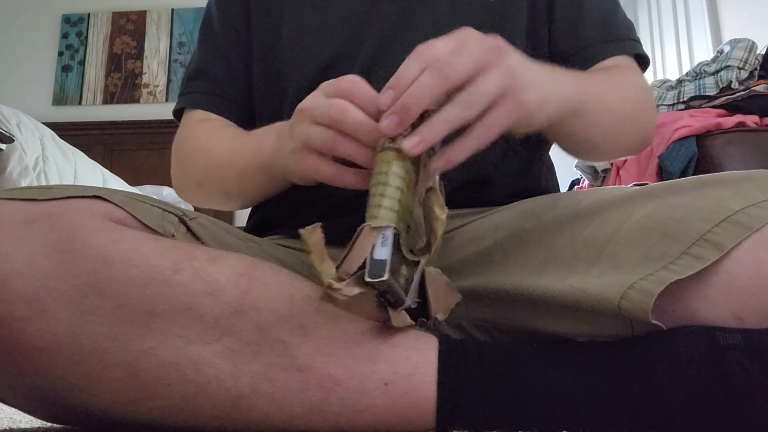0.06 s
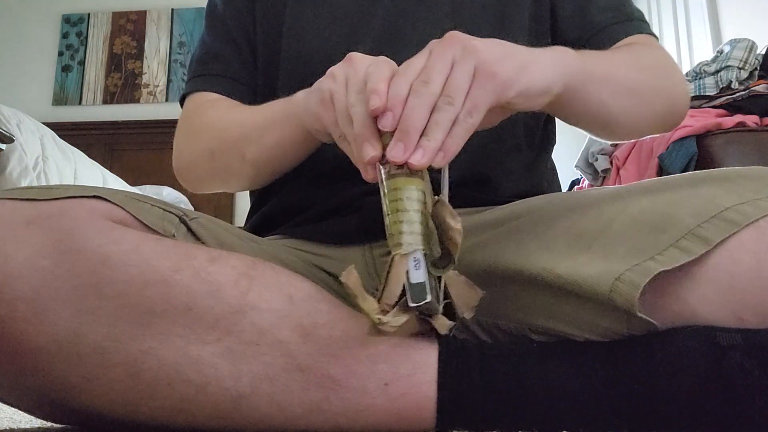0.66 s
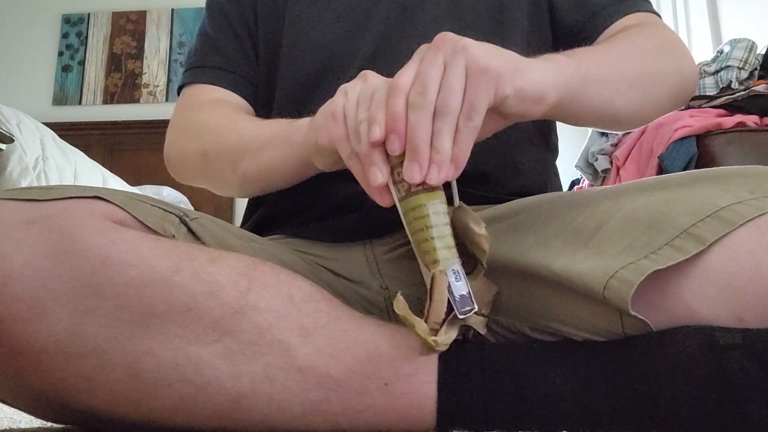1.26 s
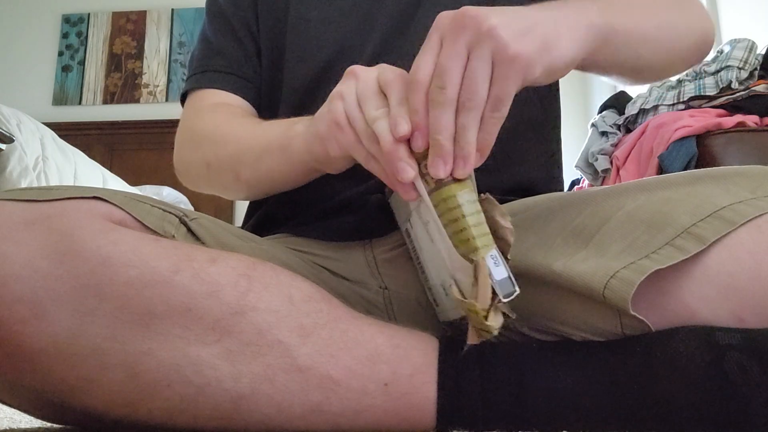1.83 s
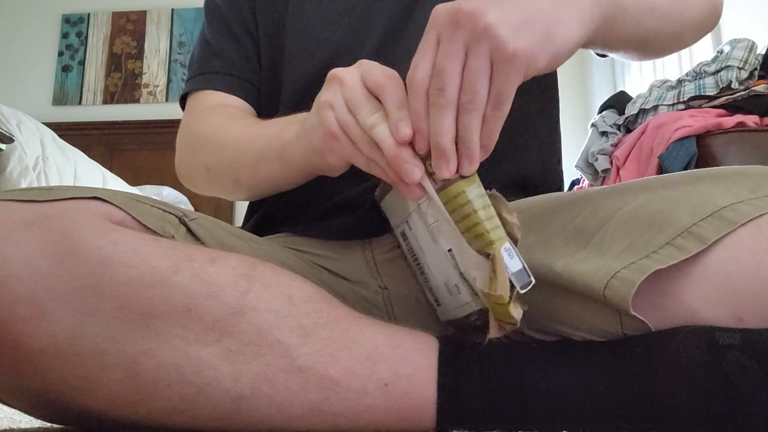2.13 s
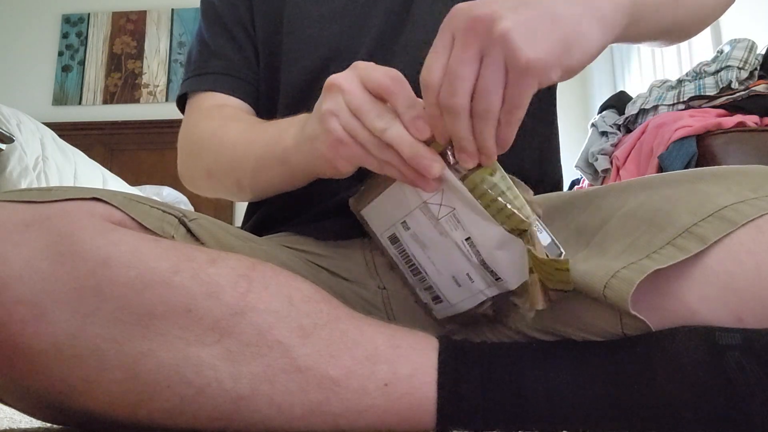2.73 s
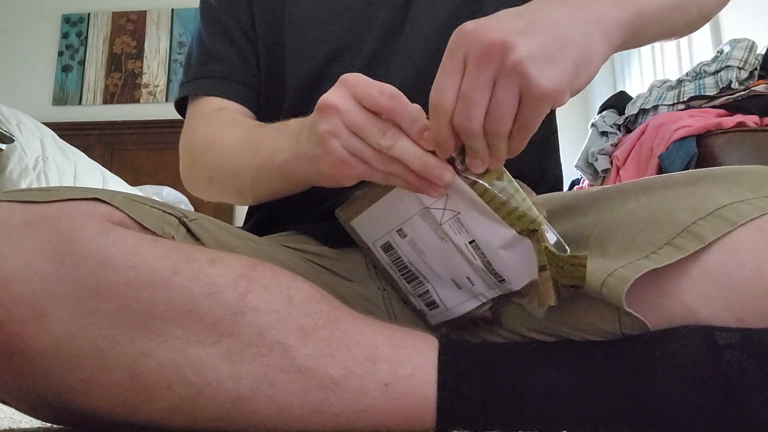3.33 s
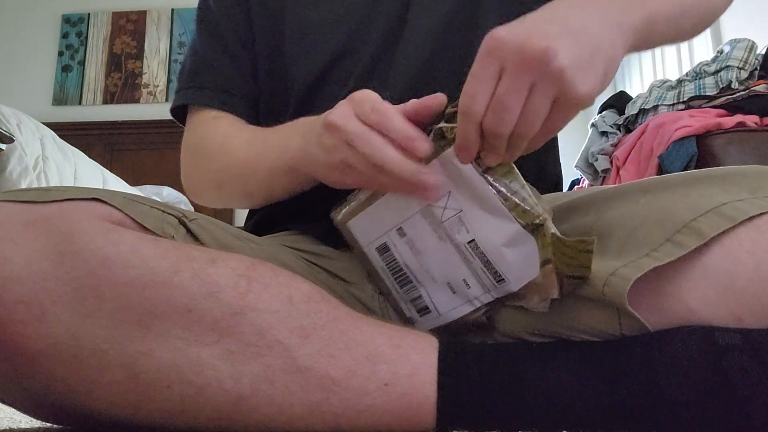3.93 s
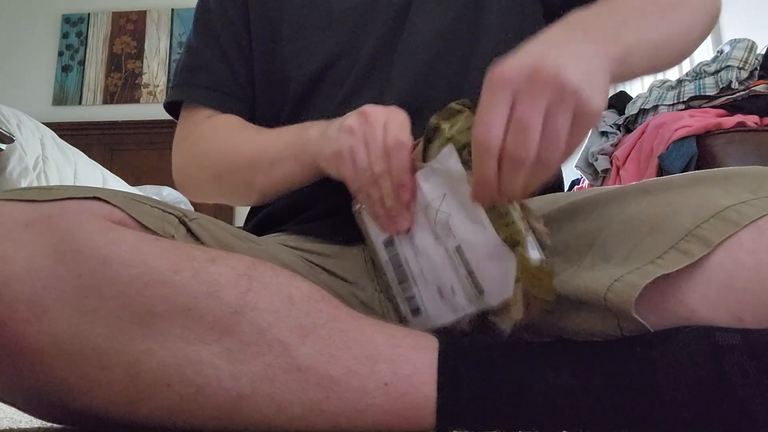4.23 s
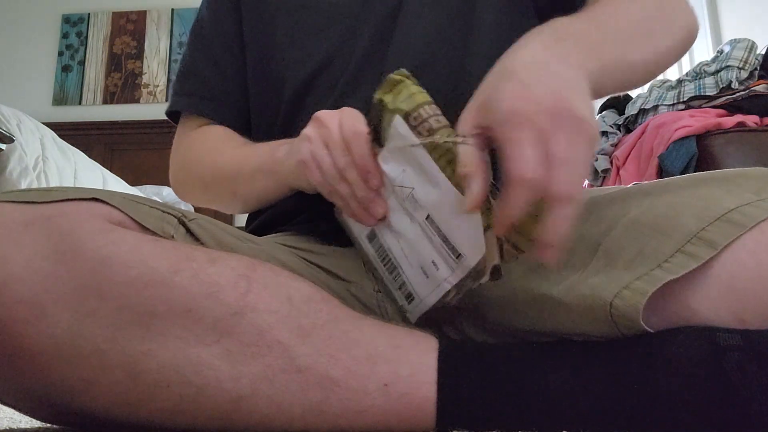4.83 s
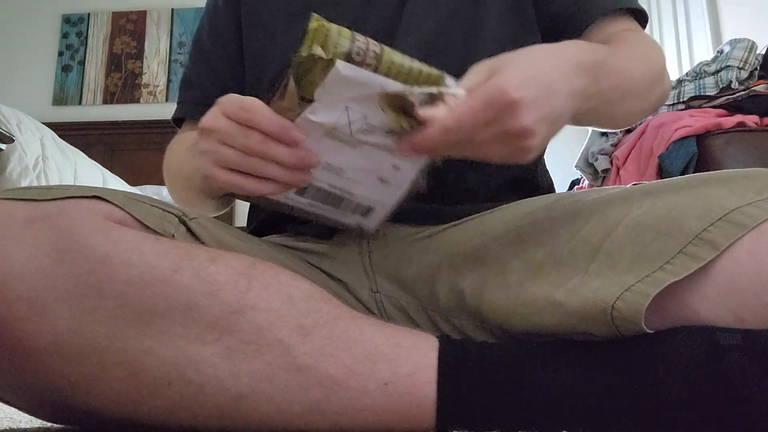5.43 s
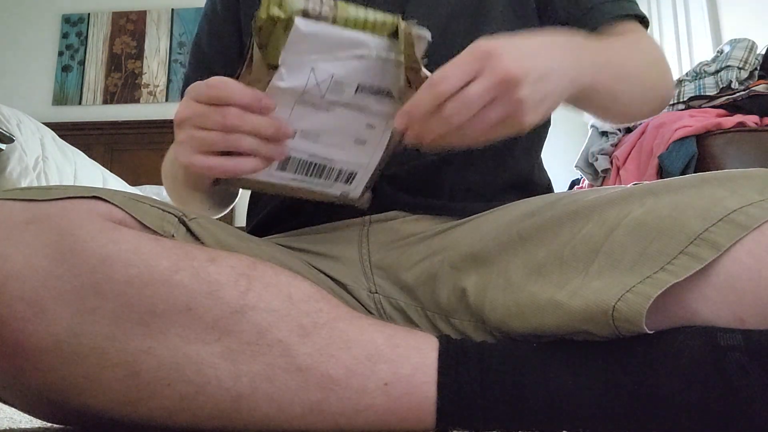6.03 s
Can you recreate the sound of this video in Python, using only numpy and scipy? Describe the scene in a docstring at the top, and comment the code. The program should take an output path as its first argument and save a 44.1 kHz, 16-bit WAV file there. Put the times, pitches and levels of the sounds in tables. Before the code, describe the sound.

A padded paper envelope is worked by hand near a stereo microphone in a quiet bedroom. It starts with soft sliding and rustling, dotted with crisp crackles and gentle thuds, and one brief scratchy slip. After a quieter spell comes a louder cluster of paper snaps and bumps, followed by more hissy rubbing and crinkling. A faint house hum lies underneath.

```python
"""Fingers and cloth rub over a torn padded paper mailer, on a lap in a bedroom, close to a stereo microphone.
Small creases crinkle under the strokes, the stiff paper buckles in sharp snaps, and the padded body
takes dull bumps. One edge briefly sticks and slips in a run of tiny ticks.
The furnished room answers shortly, over the faint hum of the house."""
import sys
import numpy as np
from scipy import signal
from scipy.fft import rfft, irfft, next_fast_len
from scipy.io import wavfile
from scipy.ndimage import uniform_filter1d

SR = 44100
rng = np.random.default_rng(int(sys.argv[2]) if len(sys.argv) > 2 else 0)


def bounce(signal):
    """Save signal as a 16-bit WAV file at the path given by the first command-line argument."""
    frames = np.transpose(np.atleast_2d(signal))
    limited = np.clip(frames, -1, 1)
    pcm = np.round(limited * 32767).astype(np.int16)
    wavfile.write(sys.argv[1], SR, pcm)


N = 272097
TIME = np.arange(N) / SR
SIZE = 4096  # samples in a filter or a single impact
BIN_HZ = np.fft.rfftfreq(SIZE, 1 / SR)
LEAD_IN_S = 0.02  # a panel strains this long before it pops


def amp(db):
    """Decibels to gain."""
    return 10 ** (np.asarray(db) / 20)


def unit_rms(x):
    """Scales to rms 1."""
    return x / np.sqrt(np.mean(x ** 2) + 1e-20)


def curve(points, hz=BIN_HZ):
    """Interpolates rows of frequency and value on a log-frequency axis."""
    point_hz, value = np.transpose(points)
    return np.interp(np.log(hz + 1), np.log(point_hz + 1), value)


def add(mix, start_s, sound):
    """Mixes a stereo sound in at start_s."""
    part = mix[:, max(round(start_s * SR), 0):][:, :sound.shape[1]]
    part += sound[:, :part.shape[1]]


def colour(x, db):
    """Minimum-phase filter with gain db at BIN_HZ: each resonance rings after its cause."""
    cepstrum = irfft(np.log(amp(np.maximum(db, db.max() - 80))))
    cepstrum[1:SIZE // 2] *= 2
    cepstrum[SIZE // 2 + 1:] = 0
    impulse = irfft(np.exp(rfft(cepstrum)))
    return signal.oaconvolve(x, impulse[None], axes=1)[:, :x.shape[1]]


def hit(x, db):
    """Gives a sound the energy of 10 ms at the level db."""
    return amp(db) * unit_rms(x) * np.sqrt(0.01 * SR / x.shape[1])


def wander(per_s):
    """A slow random curve of rms 1."""
    knots = np.arange(0, TIME[-1] + 1, 1 / per_s)
    return unit_rms(np.interp(TIME, knots, rng.standard_normal(len(knots))))


def microphone(x):
    """Both ports hear row 0 of x; row 1 sets them apart. The left is nearer and brighter."""
    # Each row: frequency in Hz, likeness of the two ports from 0 to 1.
    port_likeness = [(60, 0.94), (300, 1), (1000, 0.89), (2000, 1), (5000, 0.71), (14000, 0.88)]
    # Each row: frequency in Hz, left over right in dB.
    port_balance = [(60, 0.42), (250, 1.2), (1200, 5.4), (4400, 1.9), (8000, 4.9), (13000, 7)]
    # Each row: frequency in Hz, phase lead of the left port in radians.
    port_lead = [(60, 0.2), (250, 0.092), (1000, 0.69), (2500, 1.22), (5000, 1.26), (9000, 1.8),
                 (15000, 1.44)]
    size = next_fast_len(x.shape[1] + SIZE)
    hz = np.fft.rfftfreq(size, 1 / SR)
    likeness, ratio = curve(port_likeness, hz), amp(curve(port_balance, hz))
    common, apart = rfft(x, size) * np.sqrt([(1 + likeness) / 2, (1 - likeness) / 2])
    left = (common + apart) * ratio
    right = (common - apart) * np.exp(-1j * curve(port_lead, hz))
    return irfft(np.array([left, right]) * np.sqrt(2 / (1 + ratio ** 2)), size)[:, :x.shape[1]]


def mailer_db():
    """The lift that the mailer's resonances give to all that excites it."""
    # Each row: resonance in Hz, width in Hz, lift in dB.
    modes = [(290, 69, 3.5), (478, 190, 4), (674, 28.4, 4), (1063, 110, 5), (1430, 290, 2.5), (1864, 68, 2),
             (2120, 650, 7.5), (4060, 350, 2.5), (4750, 260, 4.5), (5650, 330, 6), (7510, 670, 6),
             (11460, 760, 2.5)]
    return sum(db / (1 + (2 * (BIN_HZ - hz) / width) ** 2) for hz, width, db in modes)


def finger_strokes(attack_s=0.041, release_s=0.028):
    """Levels in dB of cloth, rustle, hiss and grain: each stroke swells and lets go over the grip."""
    # Fingers slide over the mailer. Each row: start in seconds, seconds until release, panel rustle
    # in dB, cloth and surface hiss each in dB over the rustle, fine grain in dB over the hiss.
    strokes = [(-0.043, 0.058, -48.5, -10, -8.5, 2), (0.168, 0.04, -53.5, -0.5, 0, -8),
               (0.263, 0.071, -59.5, 5, -3.5, -10), (0.358, 0.071, -56.5, 1, -6.5, 0.5),
               (0.446, 0.16, -60.5, 2.5, -9.5, 1), (0.589, 0.091, -57, 2, -4, -8),
               (0.846, 0.082, -58, -2, -1.5, -2), (0.986, 0.13, -65.5, -6, 0.5, -1),
               (1.26, 0.084, -57.5, -4, -4.5, 4.5), (1.373, 0.13, -57, -8, -7, 4.5),
               (1.519, 0.059, -59.5, 3, -9, 13), (1.671, 0.15, -58.5, -4, -14, -2),
               (1.828, 0.09, -61, 0.5, -18, -13), (2.015, 0.069, -51, -4.5, -12, -12),
               (2.134, 0.11, -56, -6, -8, -7), (2.53, 0.071, -66, 2, -4, -13),
               (2.64, 0.057, -48.5, 0, -10, -3), (2.713, 0.14, -63, 3.5, -6.5, -7),
               (3.073, 0.116, -66, -19, -7.5, 6), (3.329, 0.057, -59, -6, -1.5, 0.5),
               (3.652, 0.071, -52.5, -1, -2.5, 1), (3.858, 0.078, -55.5, -1, -1.5, -13),
               (3.925, 0.08, -52.5, 2, 0, -11), (4.056, 0.12, -51.5, -1, -8, 2),
               (4.199, 0.035, -40, -0.5, 0.5, -6), (4.431, 0.068, -50.5, -6.5, 1.5, -0.5),
               (4.528, 0.15, -65, -26, -10.5, 2.5), (4.68, 0.052, -46.5, -7.5, -17.5, 3),
               (4.739, 0.059, -57.5, -1, 5.5, 4.5), (4.825, 0.037, -40.5, -10.5, -0.5, 0.5),
               (5.027, 0.21, -51.5, -8.5, 0.5, 1), (5.106, 0.054, -47.5, -9, -5, -17),
               (5.17, 0.096, -44, -15, -9, -5), (5.26, 0.16, -50, -9, -2, -3.5),
               (5.413, 0.11, -49, -27, 0, -5), (5.528, 0.11, -55.5, -11, 4, -18),
               (5.674, 0.087, -54.5, -2.5, 5.5, -2), (5.771, 0.44, -60.5, -9.5, 2.5, -13),
               (5.838, 0.04, -53.5, -7, 7.5, -7), (6.022, 0.044, -60.5, 2, 6.5, -2)]
    # The grip never rests between strokes: cloth, rustle, hiss and fine grain in dB.
    grip_db = [-67.5, -70, -71, -76.5]
    power = amp(grip_db)[:, None] ** 2 * np.ones(N)
    for start, length, rustle, cloth, hiss, grain in strokes:
        during = (TIME > start) & (TIME < start + length + 6 * release_s)
        t = TIME[during] - start
        envelope = np.minimum(t / attack_s, 1) * np.exp(-np.maximum(t - length, 0) / release_s)
        gains = amp(rustle + np.array([[cloth], [0], [hiss], [hiss + grain]]))
        power[:, during] += (gains * envelope) ** 2
    return 10 * np.log10(power)


def friction(per_s, spread_db, smooth, clump_db):
    """Tiny catches of very unequal size, in clumps, over smooth sliding noise."""
    size = amp(spread_db * np.minimum(rng.exponential(1, N), 4.5))
    size *= rng.random(N) < per_s / SR
    catches = unit_rms(size * rng.choice([-1., 1.], (2, N)))
    clumps = amp(clump_db * wander(per_s=90))
    return unit_rms((catches + smooth * rng.standard_normal((2, N))) * clumps)


def rubbing(levels):
    """Cloth, panels and paper surface sound under the same strokes, each with its own friction."""
    # Dull cloth, rustling panels, surface hiss, fine grain. Each row: frequency in Hz, gain in dB.
    cloth_tone = [(30, -16), (70, -4.5), (130, 2.5), (320, 0), (550, -3), (800, -2.5), (1500, -12.5),
                  (4000, -75)]
    rustle_tone = [(300, -22.5), (600, -5.5), (900, 1.5), (1200, 1.5), (2100, -4), (2800, -13.5),
                   (4000, -11), (9000, -54)]
    hiss_tone = [(1500, -23.5), (2700, 0.5), (3300, 0), (4500, 5.5), (6500, -0.5), (8000, -15.5),
                 (11000, -7), (16000, -30)]
    grain_tone = [(4000, -26), (6500, -3.5), (8000, 0), (10000, -4.5), (13000, -4), (16000, -3.5)]
    cloth, rustle, hiss, grain = levels
    layers = [(cloth_tone, cloth + 1, friction(per_s=250, spread_db=2.76, smooth=1, clump_db=2.16)),
              (rustle_tone, rustle - 1.5, friction(per_s=450, spread_db=3.13, smooth=1, clump_db=1.44)),
              (hiss_tone, hiss - 1.5, friction(per_s=1500, spread_db=2, smooth=0.89, clump_db=2.14)),
              (grain_tone, grain + 2, friction(per_s=900, spread_db=4.3, smooth=0.98, clump_db=3.6))]
    return sum(amp(db) * unit_rms(colour(drive, curve(tone) + mailer_db())) for tone, db, drive in layers)


def bending(x, depth_db=2.8, patch_hz=380, patch_s=0.13):
    """As the fingers move and bend the sheet, its resonances come and go."""
    hz, when, spectra = signal.stft(x, SR, nperseg=512, noverlap=384)
    patches = rng.standard_normal(spectra.shape[1:])
    patches = uniform_filter1d(patches, int(patch_hz / hz[1]) + 1, axis=0)
    patches = uniform_filter1d(patches, int(patch_s / when[1]) + 1, axis=1)
    gain = unit_rms(amp(depth_db * unit_rms(patches)))
    return signal.istft(spectra * gain, SR, nperseg=512, noverlap=384)[1][:, :N]


def house_hum(level_db=-60):
    """Room tone: the low steady hum and hiss of the house."""
    # Each row: frequency in Hz, gain in dB.
    hum_tone = [(15, -17), (28, 3), (42, 5), (62, 8.5), (90, 0.5), (150, -7), (400, -13), (1200, -18),
                (3000, -39), (5000, -53), (10000, -48), (16000, -45)]
    return amp(level_db) * unit_rms(colour(rng.standard_normal((2, N)), curve(hum_tone)))


def burst(rise_ms, decay_ms, shiver_db, shiver_ms):
    """A short avalanche of breaking fibres, and the weaker shiver of the sheet after it."""
    ms = np.arange(SIZE) * 1000 / SR
    rise = 1 - np.exp(-(ms / rise_ms) ** 2)
    fall = np.exp(-ms / decay_ms) + amp(shiver_db) * np.exp(-ms / shiver_ms)
    spectrum = rfft(rng.standard_normal((2, SIZE)) * rise * fall)
    power = uniform_filter1d(abs(spectrum) ** 2, size=120, axis=1)
    return irfft(spectrum / np.sqrt(abs(power) + 1e-12)) * (ms < 60)  # white on the whole


def facets(ripple_db, width_hz):
    """Every patch of the crumpled sheet has its own chance resonances: a ripple in dB."""
    ripple = uniform_filter1d(rng.standard_normal(len(BIN_HZ)), int(width_hz * SIZE / SR) + 1)
    return ripple_db * unit_rms(ripple)


def buckle(flex_db, pitch_hz, crack_db, brightness, strain_s=0.0054):
    """A panel creaks under load, then pops through with a papery knock while its crease cracks."""
    # The crack of a crease. Each row: frequency in Hz, gain in dB.
    crack_tone = [(1200, -17), (2200, -16), (3200, -10.5), (4500, 2), (9000, 2.5), (13000, 0.5), (16000, 0)]
    hz, t = BIN_HZ + 1, np.arange(SIZE) / SR
    octaves = np.log2(hz / pitch_hz)
    panel_db = 4 / (1 + (octaves / 0.51) ** 2)
    panel_db -= 8 * np.maximum(octaves, 0) ** 2 + 0.9 * np.maximum(-octaves, 0)  # steeper above the peak
    panel_db -= 10 * np.log10((1 + (hz / 2500) ** 8) * (1 + (170 / hz) ** 4))  # band-pass
    crease_db = curve(crack_tone, hz) + brightness * np.log2(np.maximum(hz, 3000) / 7500)
    sheet_db = mailer_db() + facets(ripple_db=2, width_hz=240)

    def radiate(drive, tone_db, level_db):
        """One impact passes through the sheet to the microphone."""
        return hit(microphone(colour(drive, sheet_db + tone_db)), level_db)

    settle = (1000 / pitch_hz) ** 0.54  # a large, low panel settles more slowly than a small one
    knock = radiate(burst(0.87, 1.4 * settle, shiver_db=-22, shiver_ms=5.7), panel_db, flex_db)
    crack = radiate(burst(0.8, 0.68 * settle, shiver_db=-23, shiver_ms=5), crease_db, crack_db)
    swell = np.exp(-abs(t - LEAD_IN_S) / strain_s) * (t < LEAD_IN_S)
    strain = radiate(swell * rng.standard_normal((2, SIZE)), panel_db, flex_db - 16.5)
    pop = np.roll(knock + crack, round(LEAD_IN_S * SR), axis=1)
    pan_db = -0.6 + 0.12 * max(brightness, 0)  # bright cracks face the left port
    left, right = (strain + pop) * amp([[pan_db / 2], [-pan_db / 2]])
    # Each fold faces its own way, so the two ports hear it in a different colour.
    return np.array([left, colour(right[None], facets(ripple_db=1, width_hz=700))[0]])


def crinkles(levels, per_s=45, spread_db=4, kinds=12):
    """Small creases give way at random moments, as strongly as the stroke presses them."""
    _, rustle, hiss, _ = levels
    size = amp((rustle + hiss) / 2 + spread_db * np.minimum(rng.exponential(1, N), 3))
    size *= rng.random(N) < per_s / SR
    kind = rng.integers(0, kinds, N)
    creases = [buckle(-7 + 3 * softness, 950 * 2 ** (0.4 * pitch), -10.5 - 3 * softness, 5 * tilt)
               for softness, pitch, tilt in rng.standard_normal((kinds, 3))]
    out = np.zeros((2, N))
    for i in np.flatnonzero(size):
        add(out, TIME[i], size[i] * creases[kind[i]])
    return out


def snaps():
    """The stiff paper gives way in large buckles, one by one."""
    # Each row: time of the pop in seconds, panel flex in dB, panel pitch in Hz, crease crack in dB,
    # brightness of the crack in dB per octave.
    buckles = [(0.0855, -56.5, 1340, -51, 2), (0.096, -58, 1100, -42.5, -5.5), (0.583, -46.5, 640, -73, -5),
               (0.7207, -45.5, 1530, -47.5, -27), (0.905, -41.5, 1270, -31, 9), (0.9779, -47, 840, -76, -1),
               (1.0323, -57, 910, -46, 4), (1.2907, -62, 1210, -43.5, 10.5), (1.3246, -47, 920, -26, 12),
               (1.476, -46, 890, -55.5, 4), (1.6576, -48.5, 574, -61, 10), (1.6983, -68, 1110, -42, 14),
               (1.7056, -45, 1400, -52, -2), (1.7134, -34, 1740, -32, -6.5), (1.731, -44.5, 790, -53, -32),
               (1.7743, -44, 1080, -64, 7), (1.9086, -47.5, 830, -77, -8),
               (2.0302, -45.5, 1110, -57.5, -12), (2.046, -51, 1150, -56, -13),
               (2.1301, -39, 1130, -58.5, -23), (2.1639, -45, 970, -56.5, -15),
               (2.2412, -49, 1800, -43, -1.5), (2.35, -50.5, 620, -66.5, -14), (2.6902, -41.5, 760, -57, 2),
               (2.7303, -69, 1030, -47, 17), (2.9966, -48, 900, -65, -20), (3.0197, -77, 900, -60.5, 6),
               (3.0946, -67, 896, -64.5, -2), (3.1555, -72, 900, -66, 8), (3.3118, -66, 850, -54.5, 0),
               (3.375, -38, 1100, -30.5, 3.5), (3.3804, -41.5, 1050, -31, -0.5),
               (3.4925, -68, 1420, -49, -12), (3.886, -47.5, 835, -49, -9), (3.8953, -48, 990, -44.5, 0),
               (3.9379, -40.5, 1190, -66, -6), (3.9726, -48, 726, -45, -3), (3.9994, -40, 970, -46, 3),
               (4.0662, -36, 930, -48.5, -14), (4.1328, -37.5, 1920, -26.5, 2), (4.169, -41, 800, -57, -20),
               (4.2221, -26.5, 1080, -23, 2), (4.2237, -27.5, 1180, -26.5, -0.5),
               (4.2285, -42, 790, -35, 5), (4.263, -47, 960, -43.5, -16), (4.248, -39, 940, -42, -19),
               (4.4276, -41.5, 830, -58, -3), (4.449, -41.5, 1450, -43, -21), (4.4652, -44.5, 1180, -40, 9),
               (4.6727, -47, 1950, -48, -4.5), (4.778, -37, 1320, -30.5, -3), (4.88, -43.5, 1000, -38.5, 4),
               (5.1072, -33, 1300, -28, 4.5), (5.1374, -43, 1340, -39, 2), (5.4727, -31, 1640, -37.5, -13),
               (5.5012, -42, 1080, -38.5, -8.5), (5.5282, -48, 1290, -52, -10),
               (5.5431, -43, 1580, -40.5, -15), (5.5505, -44, 910, -50, -13),
               (5.6028, -42.5, 940, -49, -13), (5.718, -43.5, 950, -27.5, 6.5),
               (5.7481, -37.5, 520, -62, -16)]
    out = np.zeros((2, N))
    for pop_s, flex_db, pitch_hz, crack_db, brightness in buckles:
        add(out, pop_s - LEAD_IN_S, buckle(flex_db, pitch_hz, crack_db, brightness))
    return out


def bumps():
    """Soft knocks and pushes on the padding land as dull thuds."""
    # Each row: start in seconds, level in dB.
    pushes = [(0.586, -57), (0.682, -49.5), (0.813, -52), (1.604, -47.5), (1.732, -51), (1.874, -54),
              (2.032, -50), (2.18, -48.5), (2.689, -49.5), (2.999, -46.5), (3.382, -55), (3.729, -47),
              (4.002, -35.5), (4.066, -37.5), (4.222, -32.5), (4.246, -56), (4.731, -37), (4.779, -44),
              (4.881, -44), (5.104, -53), (5.19, -47.5), (5.398, -51), (5.476, -51), (5.552, -47),
              (5.605, -48), (5.748, -46.5)]
    # The padded body. Each row: frequency in Hz, gain in dB.
    thud_tone = [(20, -11), (45, 1), (75, 4.5), (180, 1.5), (320, -2), (600, -20.5), (1500, -37),
                 (4000, -47)]
    out = np.zeros((2, N))
    for start, db in pushes:
        push = burst(rise_ms=1.23, decay_ms=3, shiver_db=-14, shiver_ms=13)
        thud = colour(push, curve(thud_tone) + mailer_db())
        add(out, start, hit(microphone(thud), db))
    return out


def slipping_edge(jitter=0.062, scratch_ms=0.29):
    """An edge sticks and slips in tiny bright scratches, faster and slower with the pull."""
    # Each row: time in seconds, slips a second, level in dB.
    pull = [(1.513, 360, -64), (1.543, 320, -50), (1.573, 300, -51), (1.595, 240, -56), (1.625, 240, -56),
            (1.633, 430, -53), (1.652, 380, -51), (1.665, 910, -64), (1.68, 690, -70)]
    # Each row: frequency in Hz, gain in dB.
    scratch_tone = [(2000, -26), (5500, -22), (7400, -5), (9000, -19), (11000, 1), (14000, 0), (16000, -5)]
    when, rate, db = np.transpose(pull)
    rate = np.interp(TIME, when, rate) * (1 + jitter * wander(per_s=280))
    since_slip_ms = 1000 * (np.cumsum(rate) / SR % 1) / rate
    scratches = np.exp(-since_slip_ms / scratch_ms) * rng.standard_normal((2, N))
    ticks = unit_rms(colour(scratches, curve(scratch_tone) + mailer_db()))
    return ticks * amp(np.interp(TIME, when, db, left=-140, right=-140))


def bedroom(x, early_db=-13, tail_db=-16):
    """Early echoes off lap and arms, then a short tail that dies fastest in the treble."""
    # Each row: frequency in Hz, seconds for the tail to fall 60 dB.
    decay_times = [(150, 0.24), (700, .25), (2000, 0.14), (5000, 0.22), (9000, 0.04), (15000, 0.16)]
    t = np.arange(SR // 3) / SR
    taps = rng.standard_normal((2, len(t))) * (rng.random((2, len(t))) < 0.12)
    early = taps * (t > 0.002) * np.exp(-t / 0.0039)
    diffuse = rng.standard_normal((2, len(t))) * np.clip(t / 0.012 - 0.3, 0, 1)
    hz, when, spectra = signal.stft(diffuse, SR, nperseg=256)
    decay = amp(-60 * when / curve(decay_times, hz)[:, None])
    tail = signal.istft(spectra * decay, SR, nperseg=256)[1][:, :len(t)]
    echo = amp(early_db) * early / np.linalg.norm(early[0]) + amp(tail_db) * tail / np.linalg.norm(tail[0])
    return signal.fftconvolve(x, echo, axes=1)[:, :N]


def scene():
    """The mailer close to the microphone, with the bedroom behind it."""
    levels = finger_strokes()
    rubs = bending(rubbing(levels))
    paper = snaps() + crinkles(levels) + bumps() + microphone(rubs + slipping_edge())
    return paper + bedroom(paper) + microphone(house_hum())


def record(dry):
    """The recorder's band limit cuts the highest treble."""
    lowpass = signal.firwin(255, cutoff=15950, window=("kaiser", 9), fs=SR)
    return signal.oaconvolve(dry, lowpass[None], "same")


dry = scene()
out = record(dry)
bounce(out)
```